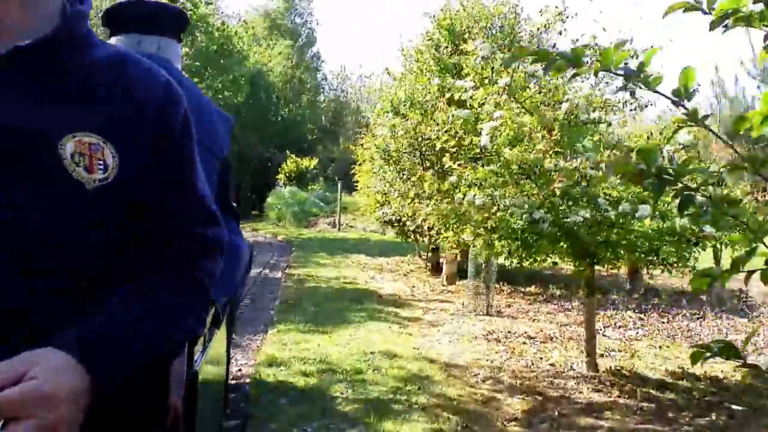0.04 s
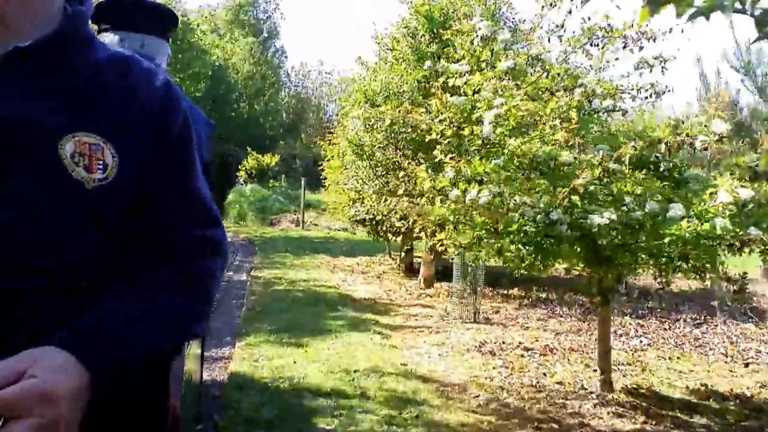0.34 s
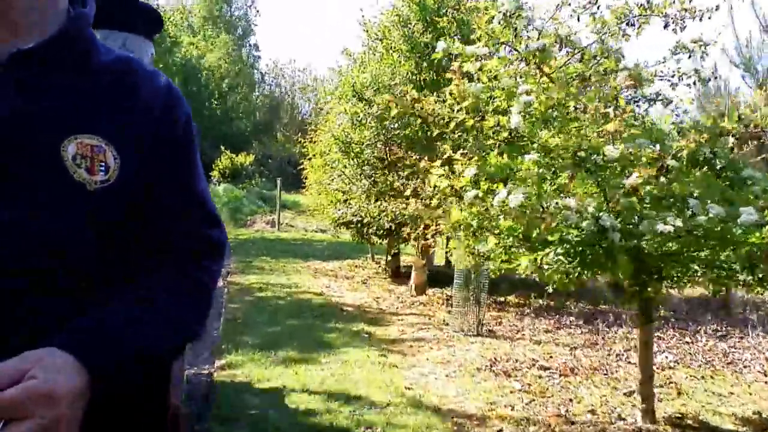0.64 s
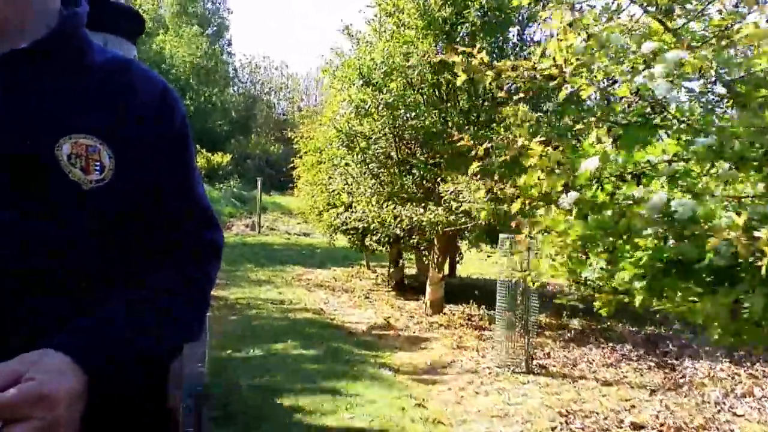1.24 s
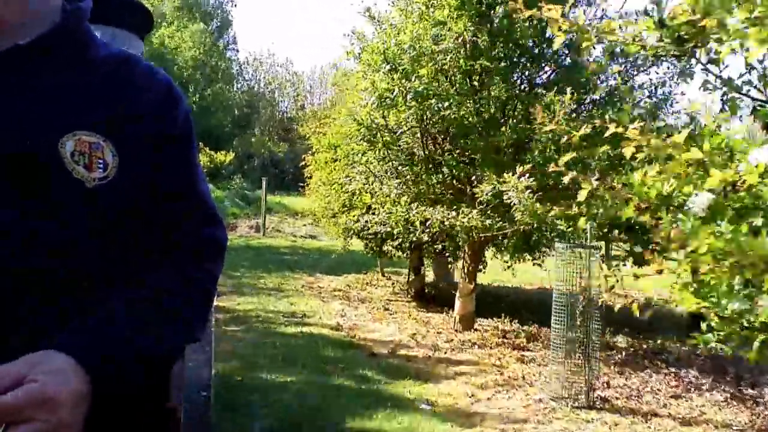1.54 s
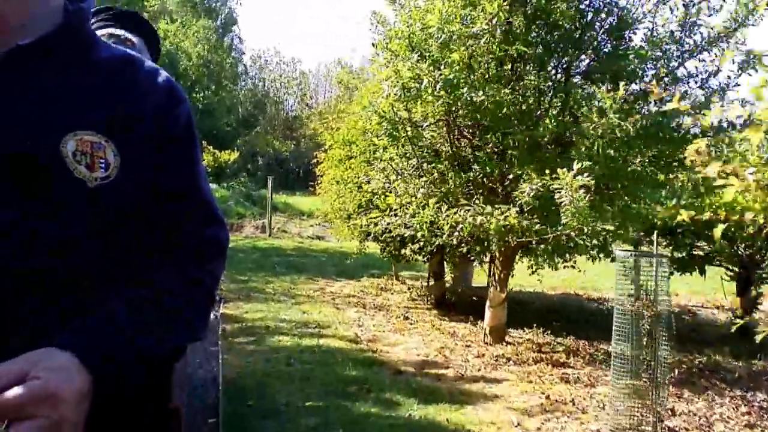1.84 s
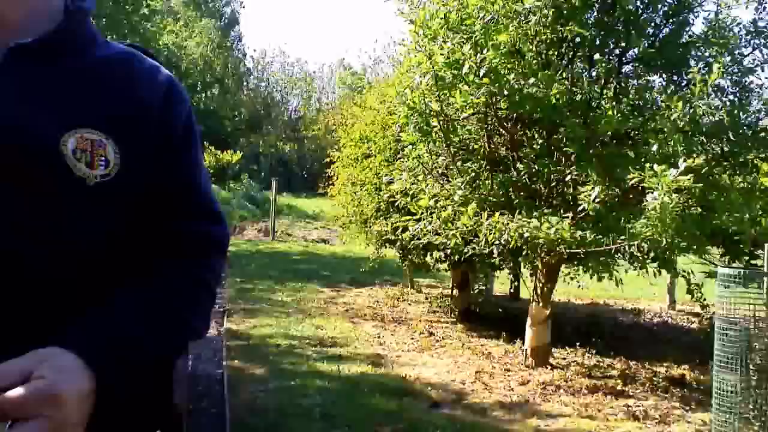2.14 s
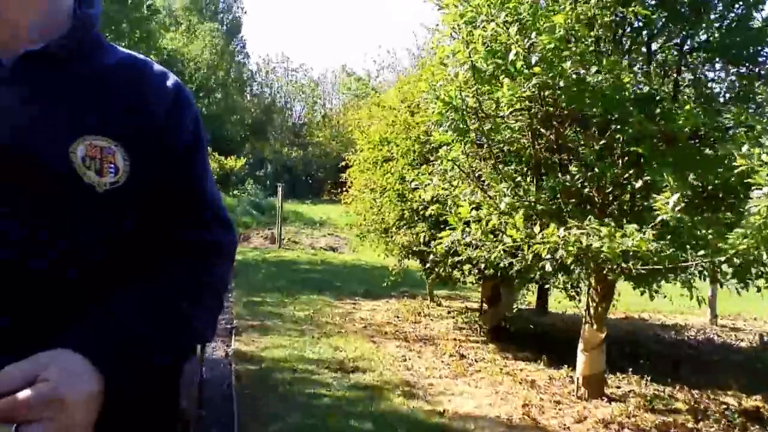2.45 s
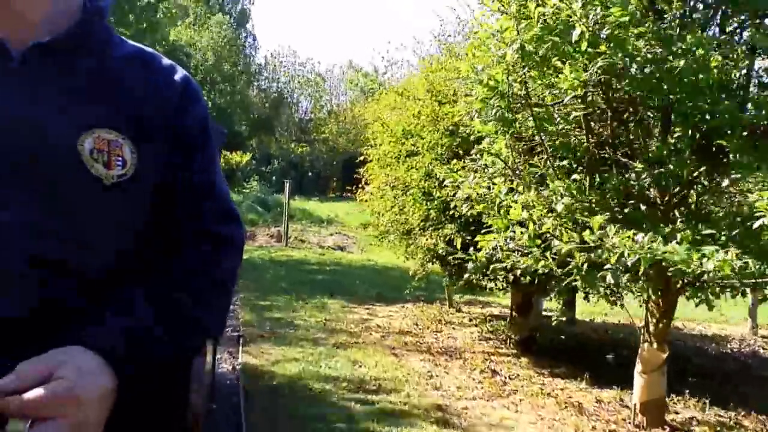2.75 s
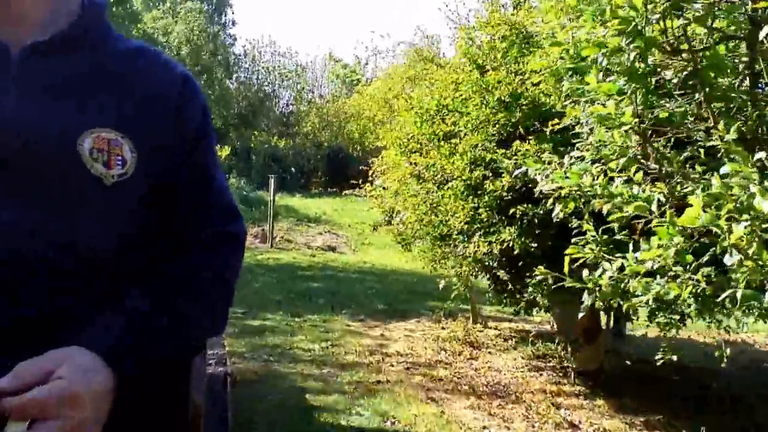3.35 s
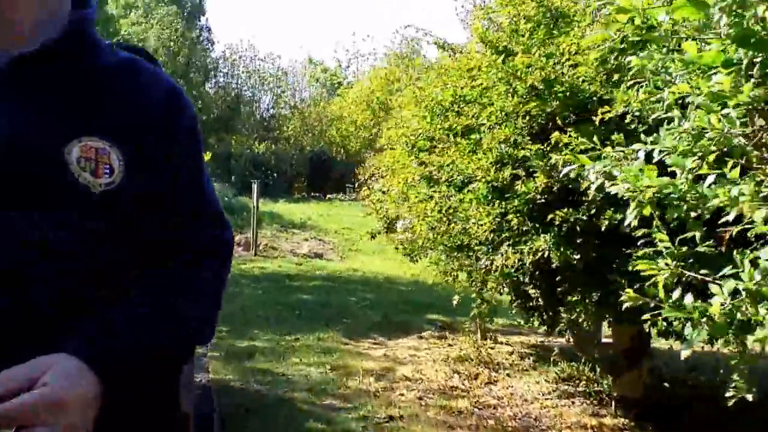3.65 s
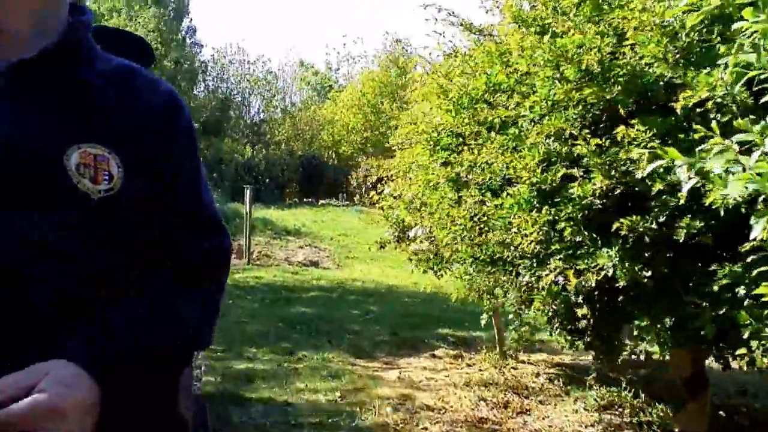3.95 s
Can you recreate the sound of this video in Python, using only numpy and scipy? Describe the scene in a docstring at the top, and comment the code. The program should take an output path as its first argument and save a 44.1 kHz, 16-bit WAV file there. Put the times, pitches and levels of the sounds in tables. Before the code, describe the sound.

Heard from aboard a small outdoor train, wheels rumble and the carriage booms, with uneven knocks, rattles and a faint pulsing hiss. Two runs of harder knocks come with light puffs of wind on the microphone, then thin out.

```python
"""Miniature garden railway, heard from the carriage, 4 s.
From the start: wheels rumble on rough rail, the body booms, joints and couplings knock, loose
fittings rattle. Something rubs with a faint hiss once per wheel turn (0.25 s), at times squeaking.
1.5-2.5 s: knocks crowd together; light wind brushes the microphone, strongest at 1.85 s.
3.1-3.6 s: a second run of hard knocks and another puff of wind. Then the knocks thin out."""
import sys
import numpy as np
from scipy import signal
from scipy.io import wavfile
from scipy.ndimage import uniform_filter1d

SR = 44100
rng = np.random.default_rng(int(sys.argv[2]) if len(sys.argv) > 2 else 0)


def persist_wave(psi):
    """Save psi, clipped to +-1, as 16-bit WAV."""
    counts = np.round(np.clip(psi, -1, 1) * 32767).astype(np.int16)
    wavfile.write(sys.argv[1], SR, np.atleast_2d(counts).T)


N = 176400
BASS_TOP_HZ, MIDDLE_TOP_HZ, CUTOFF_HZ = 300, 1200, 13200
BODY_BAND_HZ = (85, 485)

# Table levels are relative. Wind strength: t/s, level/dB
WIND_GUSTS = [(0.0, -52), (0.6, -61.5), (1.31, -64.5), (1.35, -54), (1.82, -57), (1.85, -41), (1.94, -66),
              (2.1, -47), (3.0, -52.5), (3.48, -42.5), (3.51, -53), (3.79, -49.5), (4.0, -67)]
# wind noise density: f/Hz, level/dB
WIND_SPECTRUM = [(25, -15), (48, -3.5), (70, 6), (130, -13.5), (300, -37)]
# main rub of each wheel turn: t/s, level/dB
RUBS = [(0.146, 7), (0.397, 6), (0.651, 2), (.905, -0.5), (1.16, -12), (1.412, 3.5), (1.66, 0.5),
        (1.921, -16), (2.168, 1), (2.419, 7.5), (2.679, 4.5), (2.93, 0.5), (3.19, 8.5), (3.434, -7),
        (3.689, 3), (3.94, 4.5)]
# lighter touches after each rub: delay/s, level/dB
LIGHT_RUBS = [(.068, -4), (0.166, -4)]
# rub noise density: f/Hz, level/dB
RUB_SPECTRUM = [(1500, 4), (3500, 6), (5800, -2.5), (7800, -15.5), (10000, -18), (12300, -22.5),
                (14000, -34)]
# rub squeaks: t/s, f/Hz, level/dB
SQUEAKS = [(.972, 11800, -71), (.972, 5850, -64), (1.415, 10050, -74), (2.422, 10050, -74),
           (2.68, 10100, -76), (2.93, 10100, -73), (3.69, 9900, -72), (3.695, 5800, -63)]
# rolling noise: t/s, bass/dB, middle/dB, treble/dB
ROLL_LEVELS = [(0.0, -20, -28.5, -42), (0.09, -28.5, -31, -45.5), (0.22, -25, -33.5, -46),
               (0.44, -29.5, -33, -47.5), (0.82, -25, -29.5, -43.5), (1.36, -26.5, -32, -47),
               (1.53, -25.5, -30.5, -45), (1.75, -26.5, -30, -45), (1.84, -26.5, -31, -45),
               (2.07, -26, -34, -46.5), (2.24, -29, -28.5, -44.5), (2.33, -29, -30.5, -45.5),
               (2.47, -25.5, -35, -45.5), (2.63, -30.5, -32, -46.5), (3.05, -29, -34, -47.5),
               (3.33, -31, -29.5, -44), (3.62, -25, -33.5, -47.5), (4.0, -30, -31, -47)]
# rolling noise density: f/Hz, level/dB
ROLL_SPECTRUM = [(40, -31.5), (62, -30.5), (90, -8.5), (115, -6.5), (150, 3), (190, -1.5), (225, -0.5),
                 (300, -8.5), (480, -6.5), (630, -15.5), (900, -18.5), (1350, -30), (2000, -35),
                 (2800, -38.5), (4000, -46.5), (6000, -55), (7800, -71), (10000, -64), (13000, -71)]
# carriage body modes: f/Hz, level/dB, t60/s
BODY_MODES = [(132, -14.5, 0.056), (151.9, 5, 0.33), (155, -8.5, 0.09), (228.8, 2, 0.21), (262.4, -3, 0.1),
              (343, -3, 0.21)]
# steel frame modes: f/Hz, level/dB, t60/s
FRAME_MODES = [(1278, 4, 0.046), (1330, -10, 0.018), (1840, -4, 0.07), (2380, -5, 0.027),
               (2600, -0.5, 0.028), (3540, -10.5, 0.33), (3650, -7.5, .07)]
# knocks of joints, couplings and fittings:
# t/s, thump/dB, clatter/dB, board/dB, clank/dB, tick/dB, contact/s, thump/Hz, board/Hz, clank/Hz
KNOCKS = [ (.046, -16, -25.5, -41, -43, -42.5, 0.016, 155.4, 897, 1560),
          (.187, -19.5, -42, -47, -46, -50, 0.0067, 168, 580, 1830),
          (0.228, -12.5, -22, -35.5, -41.5, -42, 0.019, 164, 557, 1580),
          (0.477, -25, -35, -28, -52, -51, .007, 283, 523, 1220),
          (.698, -20.5, -34, -28.5, -53, -68, 0.013, 148, 473, 1300),
          (.785, -20, -27, -27.5, -51, -60, 0.023, 177, 455, 1310),
          (0.892, -15.5, -26.5, -45.5, -38, -42, .011, 221, 510, 1550),
          (.970, -17.5, -44, -50, -62, -59, .011, 171.6, 500, 1700),
          (1.082, -15.5, -27, -28, -49, -56, 0.016, 229, 472, 1020),
          (1.311, -37, -31, -38.5, -39, -53, 0.0063, 188, 947, 2270),
          (1.320, -25, -25, -39, -34.5, -48, .009, 190, 954, 2476),
          (1.354, -20.5, -26.5, -28.5, -48, -49, 0.011, 245, 525, 1710),
          (1.548, -19.5, -27, -28.5, -40, -43, 0.023, 157, 647, 1630),
          (1.606, -30, -22.5, -29, -41.5, -61, 0.0053, 143, 575, 1770),
          (1.645, -14.5, -18, -28, -29.5, -43, 0.011, 164, 702, 1390),
          (1.665, -26, -28, -24.5, -44, -52, .005, 163, 594, 2510),
          (1.773, -37, -27.5, -38.5, -39, -39, 0.017, 199, 680, 2150),
          (1.827, -13.5, -19, -26, -32.5, -38, 0.017, 185, 757, 2250),
          (1.844, -20.5, -29, -24.5, -30, -46, 0.0059, 151, 468, 2530),
          (2.008, -27, -31, -35, -43.5, -63, .006, 155, 468, 1680),
          (2.075, -26, -26, -38, -38, -44, .005, 194, 845, 1460),
          (2.083, -23.5, -23.5, -35, -34, -36.5, 0.0045, 202, 857, 3390),
          (2.105, -22, -25, -34, -38, -57, 0.012, 241, 817, 1290),
          (2.125, -24, -31, -29.5, -43, -56, 0.015, 198, 847, 1250),
          (2.141, -26.5, -35.5, -31, -42, -50, 0.0075, 232, 514, 1780),
          (2.174, -21, -45, -43, -40, -48, .0089, 156, 960, 1280),
          (2.204, -20.5, -33, -34.5, -38.5, -41.5, 0.0035, 148, 870, 2500),
          (2.230, -19.5, -31, -35.5, -48, -48, 0.0069, 156, 574, 1610),
          (2.256, -25, -35, -35, -34, -51, 0.027, 173, 727, 2030),
          (2.267, -32, -28.5, -30, -32.5, -33, 0.0042, 163, 736, 3620),
          (2.283, -24.5, -23, -34.5, -47, -55, 0.016, 175, 744, 1150),
          (2.352, -24, -25.5, -36, -45, -55, 0.0046, 152, 883, 1520),
          (2.433, -22.5, -26.5, -33, -53.5, -52, 0.024, 161.6, 694, 1050),
          (2.474, -12, -32, -30.5, -42.5, -54, 0.019, 170.4, 510, 2230),
          (2.718, -20.5, -21, -31, -44, -49, 0.0034, 154, 905, 1640),
          (2.83, -28.5, -31.5, -39, -47, -67, 0.0053, 240, 1010, 2520),
          (2.953, -30, -24, -32.5, -46, -48, 0.0025, 207, 444, 1020),
          (2.958, -14.5, -21.5, -44, -34, -52, 0.0048, 210, 1245, 1340),
          (3.097, -28, -45, -36.5, -48, -58, .005, 238, 985, 1670),
          (3.144, -13, -25.5, -23, -49, -60, 0.0037, 212.6, 426, 800),
          (3.186, -22, -27.5, -33, -41, -34, 0.0028, 123, 820, 2960),
          (3.256, -12, -14.5, -34.5, -33.5, -36.5, 0.0031, 213, 565, 1500),
          (3.282, -28, -17, -32, -26.5, -31.5, .004, 363, 1070, 1360),
          (3.391, -23, -22.5, -24.5, -39, -65, 0.022, 137.7, 483, 910),
          (3.437, -13, -22, -27.5, -36.5, -35.5, 0.0073, 256.6, 550, 2660),
          (3.473, -21, -20, -23, -33.5, -60, 0.012, 204, 742, 1810),
          (3.502, -24, -28.5, -39, -42, -64, 0.013, 239, 688, 1300),
          (3.581, -17.5, -26.5, -35, -39.5, -47, 0.016, 206, 960, 1670),
          (3.682, -20, -31, -40.5, -55.5, -59, 0.0081, 155, 495, 1500),
          (3.740, -20, -39, -41, -59, -53, 0.015, 147, 576, 1800),
          (3.842, -33, -27.5, -35, -42.5, -59, 0.0031, 161, 817, 1360)]


def from_db(db):
    """Decibels to gain."""
    return 10 ** (np.asarray(db) / 20)


def unit_rms(x):
    """Scale to rms 1."""
    return x / np.sqrt(np.mean(x ** 2) + 1e-20)


def curves(rows):
    """Level columns of a time table, interpolated per sample."""
    times_s, *columns = np.transpose(rows)
    return [np.interp(np.arange(N) / SR, times_s, column) for column in columns]


def drift(rate_hz):
    """Low-passed random wander, rms 1."""
    hop, settle = 40, 2000
    pole = np.exp(-2 * np.pi * rate_hz * hop / SR)
    noise = rng.standard_normal(N // hop + settle + 2)
    slow = signal.lfilter([1], [1, -2 * pole, pole * pole], noise)[settle:]
    return np.interp(np.arange(N) / hop, np.arange(len(slow)), unit_rms(slow))


def bell(t, width_s):
    """Gaussian swell, peak 1 at t = 0."""
    return np.exp(-(t / width_s) ** 2 / 2)


def band(x, low_hz, high_hz, order=2):
    """Butterworth band-pass."""
    return signal.sosfilt(signal.butter(order, [low_hz, high_hz], "band", fs=SR, output="sos"), x + 1e-18)


def ring(x, hz, t60_s):
    """One damped mode driven by x."""
    radius, angle = from_db(-60 / (t60_s * SR)), 2 * np.pi * hz / SR
    return signal.lfilter([1, 0, -1], [1, -2 * radius * np.cos(angle), radius ** 2], x + 1e-18)


def note(t, hz, t60_s):
    """Decaying sine, random phase."""
    return from_db(-60 * t / t60_s) * np.sin(2 * np.pi * (hz * t + rng.random()))


def banded_noise(spectrum, low_hz, high_hz, flicker_db, flicker_hz):
    """Third-octave noise bands, each flickering on its own; rms 1."""
    hz, db = np.transpose(spectrum)
    edges_hz = np.geomspace(low_hz, high_hz, int(3 * np.log2(high_hz / low_hz)) + 2)
    out = 0
    for low, high in zip(edges_hz, edges_hz[1:]):
        level_db = np.interp(np.log(low * high) / 2, np.log(hz), db) + flicker_db * drift(flicker_hz)
        out += from_db(level_db) * band(rng.standard_normal(N), low, high, order=4)
    return unit_rms(out)


def contacts(t, attack_s, decay_s, tail_db, grain_db):
    """Flurry of uneven contacts with a weaker, longer tail."""
    noise = rng.standard_normal(len(t))
    grains = rng.standard_normal(len(t) // 24 + 1).repeat(24)[:len(t)]
    decay = np.exp(-t / decay_s) + from_db(tail_db) * np.exp(-t / (2.1 * decay_s))
    return noise * from_db(grain_db * grains) * (1 - np.exp(-t / attack_s)) * decay


def steel_tone(x, low_hz, high_hz, top_hz):
    """Dull colour of steel fittings: broad band, steep top cut."""
    broad = band(band(x, low_hz, high_hz, order=1), low_hz / 2, CUTOFF_HZ)
    return signal.sosfilt(signal.butter(5, top_hz, fs=SR, output="sos"), broad)


def wind():
    """Gusts on the microphone: lumpy low noise."""
    gust_db, = curves(WIND_GUSTS)
    buffeting = banded_noise(WIND_SPECTRUM, 25, BASS_TOP_HZ, flicker_db=2.5, flicker_hz=20)
    return from_db(gust_db + 3) * buffeting


def wheel_rub():
    """Three short gritty hisses per wheel turn; some squeak."""
    t = np.arange(N) / SR
    touches = RUBS + [(at_s + delay_s, db) for at_s, _ in RUBS for delay_s, db in LIGHT_RUBS]
    swell = sum(from_db(db) * bell(t - at_s, width_s=0.01) for at_s, db in touches)
    hiss = banded_noise(RUB_SPECTRUM, MIDDLE_TOP_HZ, CUTOFF_HZ, flicker_db=1, flicker_hz=18)
    grit = unit_rms(from_db(4 * drift(rate_hz=120)))
    out = from_db(-53.5) * swell * grit * hiss
    for at_s, hz, db in SQUEAKS:
        squeak = unit_rms(ring(rng.standard_normal(N), hz, t60_s=0.012))
        out += from_db(db) * bell(t - at_s, width_s=0.016) * squeak
    return out


def rattles(treble_db, taps_per_s=65, decay_s=0.017):
    """Loose fittings chatter at random, following the rolling treble."""
    taps = (rng.random(N) < taps_per_s / SR) * from_db(1.6 * np.minimum(rng.exponential(1, N), 2.5))
    envelope = signal.lfilter([1], [1, -np.exp(-1 / (decay_s * SR))], taps + 1e-18)
    chatter = steel_tone(envelope * rng.standard_normal(N), low_hz=800, high_hz=2170, top_hz=5700)
    return from_db(treble_db - 9.5) * unit_rms(chatter)


def rolling(bass_db, middle_db, treble_db):
    """Wheels on rough rail: three noise registers that judder together."""
    judder = drift(rate_hz=7.1)
    bass = banded_noise(ROLL_SPECTRUM, 40, BASS_TOP_HZ, flicker_db=2.05, flicker_hz=7.4)
    middle = banded_noise(ROLL_SPECTRUM, BASS_TOP_HZ, MIDDLE_TOP_HZ, flicker_db=2.05, flicker_hz=27)
    treble = banded_noise(ROLL_SPECTRUM, MIDDLE_TOP_HZ, CUTOFF_HZ, flicker_db=2.4, flicker_hz=13)
    return (bass * from_db(bass_db + 0.15 + 0.5 * judder)
            + middle * from_db(middle_db + 0.38 + 0.9 * judder)
            + treble * from_db(treble_db - 3 + 0.54 * judder))


def body_boom(bass_db, evenness=0.85):
    """Rail roughness drives the body modes; evenness 0 swells freely, 1 drones level."""
    drone = 0
    for hz, db, t60_s in BODY_MODES:
        mode = ring(rng.standard_normal(N), hz, t60_s)
        envelope = np.sqrt(np.abs(uniform_filter1d(mode ** 2, size=900)) + 1e-12)
        drone += from_db(db) * unit_rms(mode / envelope ** evenness)
    return from_db(bass_db - 0.5) * unit_rms(band(drone, *BODY_BAND_HZ, order=3))


def body_thump(t, spot_hz, rise_s=0.0023, damping_s=0.055, lag_s=0.0031):
    """The struck spot and the heavy body answer just after the contact."""
    body = sum(from_db(db - 6) * note(t, hz, t60_s) for hz, db, t60_s in BODY_MODES)
    thump = body * np.exp(-t / damping_s) + 2 * note(t, spot_hz, t60_s=0.094)
    thump = band(thump * (1 - np.exp(-t / rise_s)), *BODY_BAND_HZ)
    return np.interp(t - lag_s, t, thump, left=0)


def board_clatter(t, contact_s):
    """Boards clatter: mid-band contacts."""
    flurry = contacts(t, attack_s=0.00021, decay_s=2.3 * contact_s, tail_db=-13, grain_db=3)
    return band(flurry, low_hz=250, high_hz=931, order=4)


def board_ring(t, hz, rise_s=0.002):
    """A struck board rings briefly, hollow."""
    return note(t, hz, t60_s=0.14) * (1 - np.exp(-t / rise_s))


def frame_clank(t, contact_s, part_hz):
    """A blow rings the steel frame, detuned per knock, and the struck part."""
    blow = contacts(t, attack_s=0.0022, decay_s=contact_s, tail_db=-12, grain_db=6)
    detune = np.exp(0.049 * rng.standard_normal())
    frame = sum(from_db(db) * unit_rms(ring(blow, hz * detune, t60_s)) for hz, db, t60_s in FRAME_MODES)
    struck = unit_rms(blow) + from_db(-11.5) * unit_rms(frame)
    clank = steel_tone(struck, low_hz=1030, high_hz=2130, top_hz=3300)
    part = band(ring(blow, part_hz, t60_s=0.04), part_hz / 2.14, part_hz * 1.41)
    return unit_rms(clank) + from_db(-7.5) * unit_rms(part)


def steel_tick(t, contact_s):
    """Steel on steel: a tick with a faint bright edge."""
    tick = contacts(t, attack_s=0.00055, decay_s=0.71 * contact_s, tail_db=-7, grain_db=3.5)
    edge = contacts(t, attack_s=0.0003, decay_s=contact_s / 2, tail_db=-13, grain_db=3)
    return (unit_rms(band(tick, low_hz=2580, high_hz=4940, order=3))
            + from_db(-31) * unit_rms(band(edge, low_hz=7000, high_hz=CUTOFF_HZ)))


def knocks(length_s=0.2, core_s=0.03):
    """Each knock excites body, boards and steel; part levels are set over the first core_s."""
    t, out = np.arange(int(length_s * SR)) / SR, np.zeros(N + SR)
    for (at_s, thump_db, clatter_db, board_db, clank_db, tick_db,
         contact_s, thump_hz, board_hz, clank_hz) in KNOCKS:
        parts = [(body_thump(t, thump_hz), thump_db - 1.5),
                 (board_clatter(t, contact_s), clatter_db - 5),
                 (board_ring(t, board_hz), board_db - 4),
                 (frame_clank(t, contact_s, clank_hz), clank_db - 4),
                 (steel_tick(t, contact_s), tick_db - 14.5)]
        start = int(at_s * SR)
        for part, db in parts:
            out[start:start + len(t)] += from_db(db) * part / np.std(part[t < core_s])
    return out[:N]


def scene():
    """Mono mix at the seat."""
    bass_db, middle_db, treble_db = curves(ROLL_LEVELS)
    rumble = rolling(bass_db, middle_db, treble_db) + body_boom(bass_db)
    return (rumble + knocks() + rattles(treble_db) + wheel_rub() + wind())[None]


def record(dry):
    """Limiter ducking after loud knocks, soft clip, top cut."""
    limit_db, release_db_per_s, ceiling = -15.5, 35, 0.55
    level_db = 10 * np.log10(np.maximum(uniform_filter1d(dry[0] ** 2, size=441), 1e-12))
    release_db = release_db_per_s * np.arange(N) / SR
    duck_db = np.maximum.accumulate(np.maximum(level_db - limit_db, 0) + release_db) - release_db
    limited = dry * from_db(-signal.lfilter(*signal.butter(1, 15, fs=SR), duck_db))
    rounded = limited / (1 + (limited / ceiling) ** 8) ** (1 / 8)
    return signal.sosfilt(signal.cheby2(12, 60, CUTOFF_HZ + 1000, fs=SR, output="sos"), rounded)


dry = scene()
out = record(dry)
persist_wave(out)
```